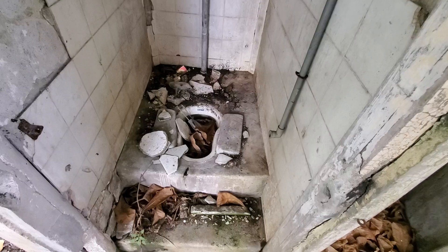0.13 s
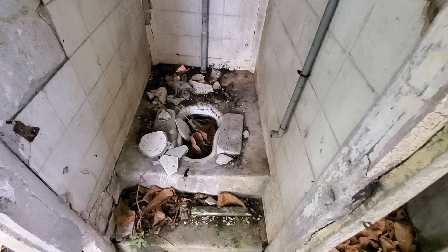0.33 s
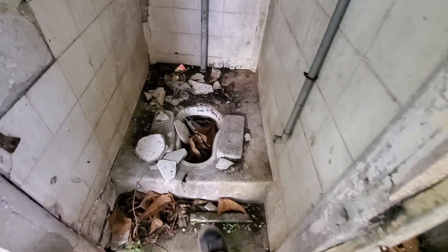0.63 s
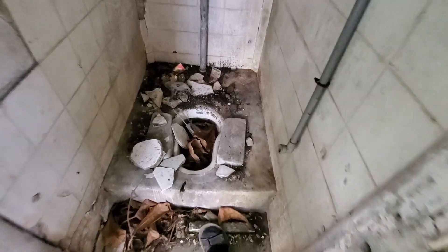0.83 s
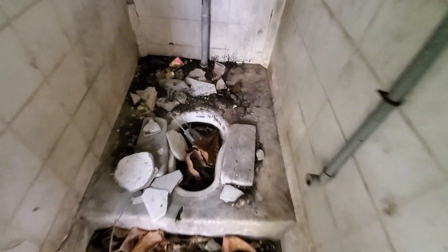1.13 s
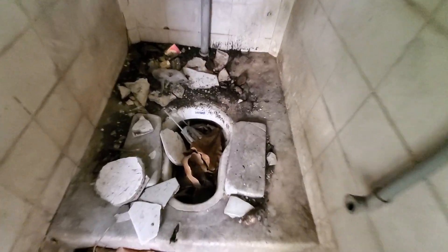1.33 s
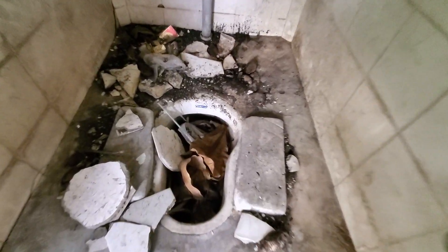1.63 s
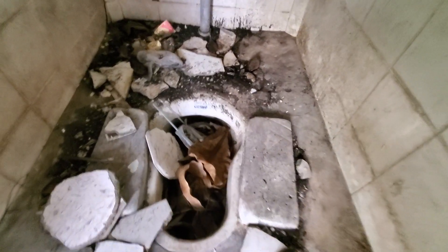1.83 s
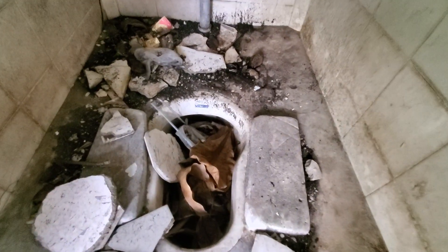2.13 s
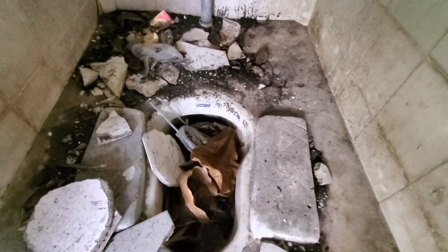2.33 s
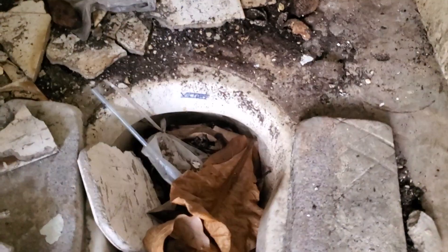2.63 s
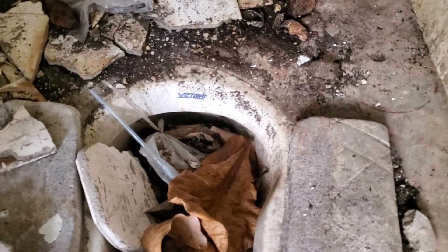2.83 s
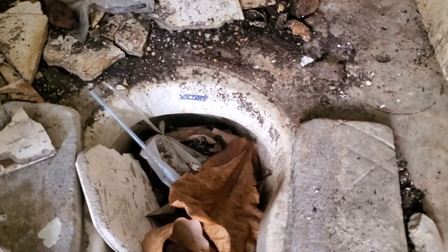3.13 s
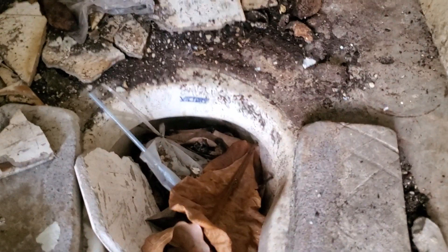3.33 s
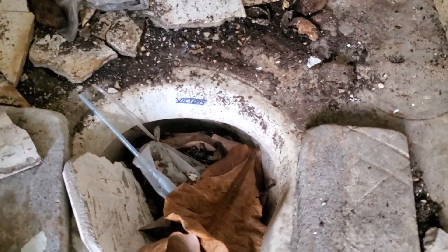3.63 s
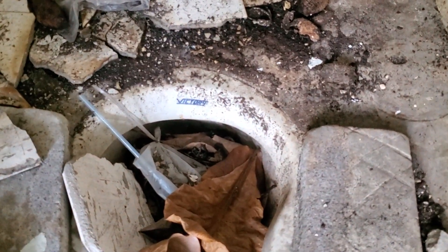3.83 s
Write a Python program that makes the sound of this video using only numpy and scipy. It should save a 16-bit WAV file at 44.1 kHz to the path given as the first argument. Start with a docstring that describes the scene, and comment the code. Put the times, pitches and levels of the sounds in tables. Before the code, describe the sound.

A few steps crackle and snap on dry leaves, with one gritty drag, in a small tiled toilet stall. Handling bumps and clicks follow on the microphone's right side, over faint outdoor hiss and a rumble that deepens inside.

```python
"""A distant outdoor hiss comes first, with dry leaves crunching underfoot. Someone holding a camera
steps over leaves and rubble into a narrow tiled cubicle, and the far noise makes the air inside boom.
Each crunch is a crowd of tiny breaks with a few sharp snaps, and the tiles add a short echo.
Fingers shift on the camera's right side, rubbing, thumping and ticking into the right microphone."""
import sys
import numpy as np
from scipy import signal
from scipy.fft import rfft, irfft, next_fast_len
from scipy.io import wavfile
from scipy.ndimage import uniform_filter1d, map_coordinates

SR = 44100
rng = np.random.default_rng(int(sys.argv[2]) if len(sys.argv) > 2 else 0)


def generate_wav(sig):
    """Save sig (samples, or channels by samples) to the path in sys.argv[1] as 16-bit PCM at SR."""
    pcm = np.round(np.clip(np.atleast_2d(sig).T, -1, 1) * 32767).astype(np.int16)
    wavfile.write(sys.argv[1], SR, pcm)


N = 176400
T = np.arange(N) / SR

# A "colour" says how strong each frequency is next to the others.
# A "lean" says how much louder the left side is than the right.
# Tones of far machinery: f/Hz, level at the door/dB, level inside/dB
DRONE_TONES = [(114.6, -44, -63.5), (239, -51, -63.5), (434, -61.5, -63)]
# Outdoor hiss, far rumble and the faint rustle of leaves and cloth over time: t/s, relative level/dB
HISS_LEVELS = [(0.36, -46), (0.96, -45.5), (1.1, -43.5), (1.3, -43), (1.56, -45.5), (2.02, -47),
               (2.35, -50), (3.01, -49.5), (3.25, -50), (3.95, -49.5)]
RUMBLE_LEVELS = [(0.36, -43), (1.11, -42.5), (1.45, -40.5), (1.92, -39), (2.32, -38.5), (2.68, -40),
                 (3.28, -41.5), (3.95, -40)]
RUSTLE_LEVELS = [(.12, -73), (.23, -71.5), (.3, -72), (.54, -69), (.85, -72.5), (1.0, -70), (1.2, -67),
                 (1.7, -70.5), (1.95, -67), (2.1, -73), (2.28, -77.5), (2.48, -83), (3.2, -80.5),
                 (3.45, -84), (3.54, -76), (3.62, -85.5), (3.97, -85)]
# Their colours, one list at the door and one inside: f/Hz, relative level/dB
HISS_COLOURS = ([(200, -35), (300, -3), (500, -4), (900, -4), (1300, -4), (2000, -7), (3700, -18),
                (5500, -15), (6800, -24.5), (7500, -39.5), (8500, -69.5)], [(200, -31.5), (300, -19),
                (340, -10.5), (450, -9.5), (520, -3), (560, -9.5), (625, -2.5), (700, -8), (1000, -8.5),
                (2300, -13.5), (3800, -20.5), (5600, -27.5), (6400, -40), (7200, -63), (8500, -87.5)])
RUMBLE_COLOURS = ([(20, -15), (30, -18.5), (45, 5.5), (90, 0.5), (115, -5.5), (135, 0), (190, -6),
                  (225, -11.5), (243, 0), (262, -11.5), (400, -21), (500, -65)], [(20, -32.5), (30, -16.5),
                  (45, 7.5), (90, 4), (130, -10.5), (160, -7.5), (200, -2), (245, -14.5), (300, -14),
                  (400, -37), (500, -63.5)])
RUSTLE_COLOURS = [(4410, -43), (7500, -16), (8730, -3.5), (9700, -5.5), (12200, 2), (15100, -3),
                  (16000, -7)], [(4410, -38), (7500, -22.5), (9390, 5.5), (12600, -4.5), (14400, 4.5),
                  (16000, 2)]
# Leans of the hiss (at the door, then inside) and of the rustle: f/Hz, lean/dB
HISS_LEANS = ([(300, 0), (1000, 2), (1900, -1), (3300, 8.5), (5500, 2.5), (7200, -5.5)], [(300, -9),
              (700, 4), (2400, -2), (3300, 5), (4400, 7), (6500, 24)])
LEAF_CLOTH_LEAN = [(8000, 1), (10000, -1), (12000, -6), (14500, 8.5), (16000, -5)]
# How alike the far noise is on the two sides: f/Hz, likeness (1 = the same, 0 = unrelated)
SIDE_LIKENESS = [(60, 0.95), (130, 0.97), (290, 0.82), (640, 0.72), (1410, 0.043), (3100, 0.097),
                 (6820, -0.17), (15000, -0.02)]
# The cubicle's lowest ringing note: t/s, f/Hz, level/dB
BOOM_NOTE = [(0.16, 61.7, -39), (0.46, 63.2, -35.5), (0.48, 60.2, -61), (0.54, 61.6, -33.5),
             (0.68, 64, -35), (0.82, 68.1, -60), (0.95, 65.3, -27), (1.16, 59.4, -33.5), (1.33, 63, -23.5),
             (1.51, 65.7, -31.5), (1.59, 65.2, -20), (1.84, 67.5, -15.5), (2.0, 67, -26.5),
             (2.03, 71.7, -26), (2.06, 66.7, -53.5), (2.09, 69.06, -24.5), (2.27, 67.6, -31.5),
             (2.33, 70.2, -41), (2.35, 68.2, -34), (2.4, 66.7, -23), (2.48, 62.36, -31), (2.61, 63, -25),
             (2.65, 62.7, -41), (2.74, 65.8, -18), (2.77, 66.8, -29), (2.88, 67.26, -20),
             (3.49, 66.6, -21.5), (3.75, 67.52, -27.5), (3.83, 66.48, -23), (3.97, 67.55, -30.5)]
# How long the tiles echo: f/Hz, time to fade by 60 dB/s
TILE_FADES = [(300, 0.37), (3000, 0.18), (12000, 0.045)]
# Fingers pushing on the case: t/s, rough peak level/dB, f/Hz
FINGER_PUSHES = [(1.1736, -6, 203), (1.301, -21, 267), (1.3029, -8, 138), (1.495, -20.5, 198),
                 (1.859, -14, 169), (2.009, -12.5, 74), (2.031, -18, 214), (2.072, -16, 99),
                 (2.131, -13, 77), (2.182, -9, 83.5), (2.632, -18, 84.2), (2.759, -20.5, 86.6),
                 (3.0, -14, 95), (3.037, -15.5, 97)]
# Fingers sliding on the case, weight on leaves, and a sole twisting on grit:
# t/s, rise/s, hold/s, fall/s, body level/dB, treble level/dB, lean/dB
FINGER_SLIDES = [(1.17, 0.0029, 0.015, 0.01, -31.5, -55.5, -12),
                 (1.30, 0.0039, 0.0062, 0.0071, -33, -59.5, -2.5),
                 (1.83, 0.013, .012, 0.0055, -34.5, -53, -15),
                 (1.852, 0.0099, 0.0062, 0.0055, -21, -44.5, -18),
                 (1.878, 0.0047, .02, 0.051, -33.5, -50, -19), (1.985, 0.032, 0.019, 0.019, -26, -50, -29),
                 (2.05, 0.017, 0.059, 0.11, -42.5, -72.5, -9.5),
                 (2.178, 0.013, 0.0039, 0.017, -29, -60.5, -21), (2.21, 0.018, .05, 0.038, -43, -71.5, -13),
                 (2.59, 0.01, 0.057, 0.02, -47, -67, -8.5), (2.95, 0.08, 0.016, 0.01, -35, -66, -7.5)]
LEAF_STEPS = [(.25, 0.0075, 0.092, 0.046, -41, -52, 7), (0.398, 0.031, 0.08, 0.023, -44, -58.5, 6.5),
              (.850, 0.026, 0.023, 0.013, -29, -42.5, 3.5), (.915, 0.0078, 0.018, 0.017, -47, -58, 1.5),
              (1.99, .01, 0.015, .012, -38.5, -53, -5.5), (2.045, 0.0033, 0.014, 0.014, -44, -57.5, 4)]
SOLE_TWIST = [(1.012, 0.013, 0.062, 0.014, -36.5, -46, 6.5)]
# A sole dragging over grit: t/s, relative level/dB
SOLE_DRAG = [(1.05, -75), (1.12, -54), (1.22, -47.5), (1.35, -49), (1.47, -53), (1.56, -90)]
# Colours of the fingers, leaves, twist and drag: f/Hz, relative level/dB
SKIN_COLOUR = [(180, -26.5), (300, 9), (842, -3.5), (1530, -4.5), (2880, -10.5), (3520, -12), (6000, -27),
               (6850, -43), (9300, -37.5), (11900, -34), (16000, -49.5)]
LEAF_COLOUR = [(180, -31), (300, 1.5), (656, -5), (1930, -3.5), (3030, -6), (5160, -4.5), (7080, -19),
               (7690, -37), (9710, -34), (14200, -29), (16000, -30.5)]
TWIST_COLOUR = [(350, -24), (620, -9), (1390, -7), (2090, -4), (2900, 1.5), (4580, -17), (5400, 2),
                (7520, -24.5), (13900, -19.5), (16000, -18.5)]
DRAG_COLOUR = [(500, -38), (1200, -7.5), (1900, -1.5), (3100, -11), (3500, 1.5), (3900, -13.5), (4500, -14),
               (4850, 2.5), (5300, -8), (6000, -12.5), (7600, -65)]
# Single snaps and ticks:
# t/s, peak level before the weak band/dB, lean/dB, centre f/Hz, width/octaves, time to fade by 60 dB/s
SNAPS_AND_TICKS = [(0.2942, -33, 8, 13560, 0.86, 0.01), (.3258, -34.5, -13, 9004, 2.2, .004),
                   (0.3535, -37, -7, 8960, 2.3, .006), (.416, -28, 17, 5000, 0.81, .006),
                   (.5702, -33.5, -17, 10800, 1.5, .004), (.5832, -34.5, -17, 12240, 1.4, .004),
                   (.6014, -31.5, -11.5, 12000, 1.5, 0.0048), (0.642, -28.5, 10, 5500, 0.25, 0.015),
                   (.8655, -30, 7, 2770, 0.69, .01), (.8785, -21, 10, 690, 2.2, 0.0094),
                   (.8842, -16, 12, 1990, 2.35, 0.016), (0.885, -26.5, 6.5, 13450, 0.88, 0.014),
                   (.8862, -20.5, 0, 1010, 1.1, .02), (.890, -22, -2, 1820, 0.41, .012),
                   (.9012, -28, 8, 4300, 0.6, .014), (.9312, -29, 6, 4000, 1.4, .01),
                   (1.034, -27, 13, 5390, .6, .008), (1.084, -26, 7, 3300, 1.34, 0.016),
                   (1.495, -26, 0, 2000, 1.5, 0.0069), (1.8272, -19.5, -14.5, 5000, 3, .004),
                   (1.8576, -25.5, -24, 12000, 0.61, .012), (1.8661, -4, -27, 790, 1.71, 0.005),
                   (1.8660, -8.5, -16, 5000, 3.4, 0.0059), (1.8743, -9, -25, 7500, 2.9, 0.008),
                   (1.8985, -32.5, -16.5, 12980, 0.5, .007), (1.932, -28.5, 3, 4500, 0.85, 0.0072),
                   (2.0002, -30, 7, 7520, 2.9, .01), (2.0433, -19.5, 8, 4260, 1.1, 0.024),
                   (2.0432, -34.5, 11.5, 13840, 0.75, .01), (2.1837, -21.5, -24, 532, 0.81, 0.022),
                   (2.1898, -13.5, -24, 1760, 1.28, 0.015), (2.2590, -35.5, -2, 3000, 1.3, 0.0061),
                   (2.7235, -27, -17, 701, 1.9, .01), (2.7605, -25.5, -15.5, 600, 1.6, .012),
                   (2.9015, -35, -10, 896, 1.62, 0.011), (3.0, -24, -15, 602, 1.9, .015)]

DOORWAY_S, INSIDE_S = 1.15, 2.61  # the walker passes through the doorway between these times
WEAK_HZ, WEAK_WIDTH_HZ, WEAK_DB = 9300, 640, -7  # a band the microphones pick up poorly
START_S, TOP_HZ = .111, 15950


def amp(db):
    """Turns decibels into a number to multiply by."""
    return 10 ** (np.asarray(db) / 20)


def unit(x):
    """Scales a sound to an average power of 1."""
    return x / np.sqrt(np.mean(x ** 2) + 1e-20)


def along(points, hz):
    """Reads between (frequency, value) points, giving each octave equal room."""
    f, values = np.transpose(points)
    return np.interp(np.log(hz + 1), np.log(f + 1), values)


def curves(rows):
    """Joins the rows of a time table into one curve for each column after the time."""
    times, *columns = np.transpose(rows)
    return [np.interp(T, times, column) for column in columns]


def wobble(per_s):
    """A smooth curve through per_s random values a second."""
    return map_coordinates(rng.standard_normal(400), [T * per_s])


def filtered(x, response):
    """Turns each frequency up or down by response(hz)."""
    size = 2 * next_fast_len(x.shape[-1] // 2 + 4096)
    hz = np.fft.rfftfreq(size, 1 / SR)
    return irfft(rfft(x, size) * response(hz), size)[..., :x.shape[-1]]


def causal(gain):
    """Keeps a filter's gains but lets no sound come before the blow (minimum phase)."""
    cepstrum = irfft(np.log(gain + 1e-4))
    k = np.arange(len(cepstrum))
    return np.exp(rfft(cepstrum * np.where(k == 0, 1, 2 * (k < len(k) // 2))))


def sides(lean_db):
    """Left and right gains for a lean, with the louder side at full level."""
    return amp([[min(lean_db, 0)], [min(-lean_db, 0)]])


def leaning(x, lean):
    """Moves each frequency toward the left or the right."""
    return unit(filtered(x, lambda hz: amp(np.outer([.5, -.5], along(lean, hz)))))


def passing(at_door, inside):
    """Fades from the sound at the door to the sound inside as the walls close in."""
    turn = np.pi / 2 * np.clip((T - DOORWAY_S) / (INSIDE_S - DOORWAY_S), 0, 1)
    return np.cos(turn) * at_door + np.sin(turn) * inside


def rush(colour, patchy_db):
    """Rushing noise with louder and softer patches; its low notes are alike on both sides."""
    bands = signal.stft(rng.standard_normal((2, N)), nperseg=512)[2]
    patches = uniform_filter1d(rng.standard_normal(bands.shape[1:]), 6, axis=0)
    patches = unit(uniform_filter1d(patches, 12, axis=1))
    noise = signal.istft(bands * amp(patchy_db * patches), nperseg=512)[1][:, :N]

    def response(hz):
        turn = np.arccos(np.clip(along(SIDE_LIKENESS, hz), -1, 1)) / 2
        return amp(along(colour, hz)) * [np.cos(turn), np.sin(turn)]

    shared, opposite = filtered(noise, response)
    return unit(np.array([shared + opposite, shared - opposite]))


def grainy(colour, per_s, spread_db):
    """Tiny breaks of uneven size, about per_s a second on each side, blur into a crackle."""
    happens = rng.random((2, N)) < per_s / SR
    size = amp(spread_db * np.minimum(rng.exponential(size=(2, N)), 3))
    clicks = happens * size * rng.standard_normal((2, N))
    return unit(filtered(clicks, lambda hz: amp(along(colour, hz))))


def presses(rows, colour, per_s, spread_db, treble_from_hz=7800):
    """A crackle swells, holds and fades under each press."""
    crackle = grainy(colour, per_s, spread_db)
    low = filtered(crackle, lambda hz: hz < treble_from_hz)
    body, treble = unit(low), unit(crackle - low)
    out = np.zeros((2, N))
    for start, rise, hold, fall, body_db, treble_db, lean_db in rows:
        swell = np.clip((T - start) / rise, 0, 1) ** 2
        fade = np.exp(-np.maximum(T - start - rise - hold, 0) / fall)
        out += sides(lean_db) * swell * fade * (amp(body_db) * body + amp(treble_db) * treble)
    return out


def drones(waver_db=3.0, waver_rad=0.89):
    """Far machinery hums in thin, unsteady tones."""
    out = np.zeros(N)
    for hz, door_db, inside_db in DRONE_TONES:
        level = passing(amp(door_db), amp(inside_db)) * amp(waver_db * wobble(5.83))
        out += np.sqrt(2) * level * np.sin(2 * np.pi * hz * T + waver_rad * wobble(6))
    return out


def rustle(boost_db=7.0, waver_db=0.68):
    """Leaves and cloth make a faint, high crackle."""
    crackle = passing(*[grainy(colour, per_s=7900, spread_db=-2.5) for colour in RUSTLE_COLOURS])
    level_db = curves(RUSTLE_LEVELS)[0] + boost_db + waver_db * wobble(13)
    return amp(level_db) * leaning(crackle, LEAF_CLOTH_LEAN)


def outdoor_hiss(boost_db=5.0, waver_db=0.39):
    """Distant noise fills the air and is softer inside the cubicle."""
    at_door, inside = [leaning(rush(colour, patchy_db=0.8), lean)
                       for colour, lean in zip(HISS_COLOURS, HISS_LEANS)]
    level_db = curves(HISS_LEVELS)[0] + boost_db + waver_db * wobble(4.78)
    return amp(level_db) * passing(at_door, inside)


def far_rumble(boost_db=6.5, waver_db=0.75):
    """The deep part of the outdoor noise changes colour between the walls."""
    at_door, inside = [rush(colour, patchy_db=1.35) for colour in RUMBLE_COLOURS]
    level_db = curves(RUMBLE_LEVELS)[0] + boost_db + waver_db * wobble(3.72)
    return amp(level_db) * passing(at_door, inside)


def cubicle_boom(waver_db=1.3, waver_rad=0.14, side_db=-15):
    """The air in the cubicle rings unsteadily near one low note."""
    hz, db = curves(BOOM_NOTE)
    phase = 2 * np.pi * np.cumsum(hz) / SR + waver_rad * wobble(3.37)
    side = amp(side_db) * wobble(6) * np.cos(phase)  # makes left and right a little unlike
    level = amp(db + waver_db * wobble(15))
    return np.sqrt(2) * level * (np.sin(phase) + [side, -side])


def tile_echo(sound, delay_samples=200):
    """The tiled walls throw back a short echo whose high notes die first."""
    hz, t, bands = signal.stft(rng.standard_normal((2, SR // 3)), SR, nperseg=256)
    fade = amp(-60 * t / along(TILE_FADES, hz)[:, None])
    tail = signal.istft(bands * fade, SR, nperseg=256)[1]
    delayed = np.pad(sound, ((0, 0), (delay_samples, 0)))
    return signal.fftconvolve(delayed, tail / np.linalg.norm(tail[0]), axes=1)[:, :N]


def finger_rubs():
    """Skin slides over the right of the case with a fine, even grain."""
    return presses(FINGER_SLIDES, SKIN_COLOUR, per_s=17000, spread_db=1.0)


def finger_thumps(fade_cycles=4, left_db=-30.5):
    """A soft push on the case gives a small dip, then a low swing that dies in a few cycles."""
    out, t = np.zeros(N), np.arange(SR // 8) / SR
    for start, db, hz in FINGER_PUSHES:
        cycles = hz * t
        swell = np.tanh(1.52 * cycles) ** 2
        fade = amp(db + 14.0 - 60 * cycles / fade_cycles)  # 14 dB makes up for the slow swell
        out[round(start * SR):][:len(t)] -= swell * fade * np.sin(2 * np.pi * cycles)
    return sides(left_db) * out


def sole_scrape(boost_db=5.0, waver_db=1.2):
    """Fine grit dragged under a sole sings in a few broad bands."""
    grit = grainy(DRAG_COLOUR, per_s=13000, spread_db=1.5)
    return grit * amp(curves(SOLE_DRAG)[0] + boost_db + waver_db * wobble(24.663))


def footsteps():
    """Dry leaves break under the walker's weight; a sole twists, then drags, on grit."""
    crunches = presses(LEAF_STEPS, LEAF_COLOUR, per_s=12000, spread_db=7.5)
    twist = presses(SOLE_TWIST, TWIST_COLOUR, per_s=6000, spread_db=2.5)
    return crunches + twist + sole_scrape()


def snaps():
    """Each leaf snap or finger tick is a sharp kick and a moment of noise around one pitch."""
    out, t = np.zeros((2, N)), np.arange(1024) / SR
    kick = 3.7 * (t < .0001)
    lead = 128  # samples of silence before each burst
    for start, db, lean_db, centre_hz, octaves, fade_s in SNAPS_AND_TICKS:
        burst = (rng.standard_normal((2, len(t))) + kick) * amp(-60 * t / fade_s)
        burst = np.pad(burst, ((0, 0), (lead, 0)))
        band = lambda hz: np.exp(-2 * (np.log2((hz + 1) / centre_hz) / octaves) ** 2)
        burst = filtered(burst, lambda hz: causal(band(hz)))
        burst /= np.abs(burst).max(axis=1, keepdims=True)
        out[:, round(start * SR) - lead:][:, :lead + len(t)] += amp(db) * sides(lean_db) * burst
    return filtered(out, lambda hz: amp(WEAK_DB * np.exp(-((hz - WEAK_HZ) / WEAK_WIDTH_HZ) ** 2)))


def scene():
    """Adds up all the sounds; only the feet and the left side of the snaps echo off the tiles."""
    background = drones() + rustle() + outdoor_hiss() + far_rumble() + cubicle_boom()
    feet, clicks = footsteps(), snaps()
    echo = tile_echo(amp(-14) * feet + amp(-12) * clicks[0])
    return background + echo + finger_rubs() + finger_thumps() + feet + clicks


def record(dry):
    """The sound comes on after a moment of silence, with everything above TOP_HZ cut away."""
    fade_in = np.clip((T - START_S) / 0.0055, 0, 1)
    return filtered(dry * fade_in, lambda hz: hz < TOP_HZ)


dry = scene()
out = record(dry)
generate_wav(out)
```